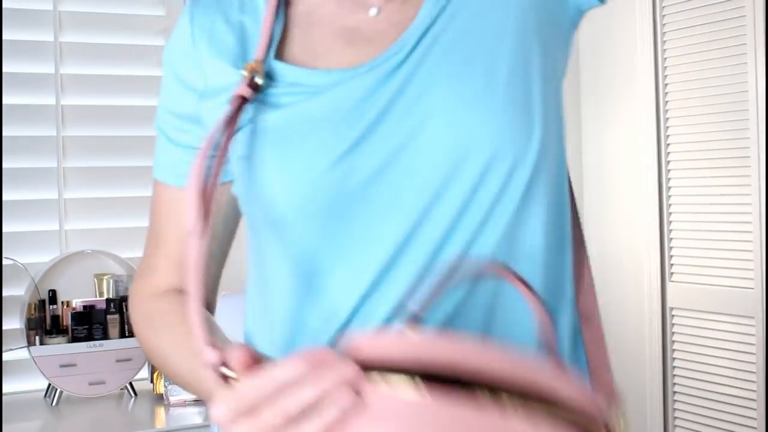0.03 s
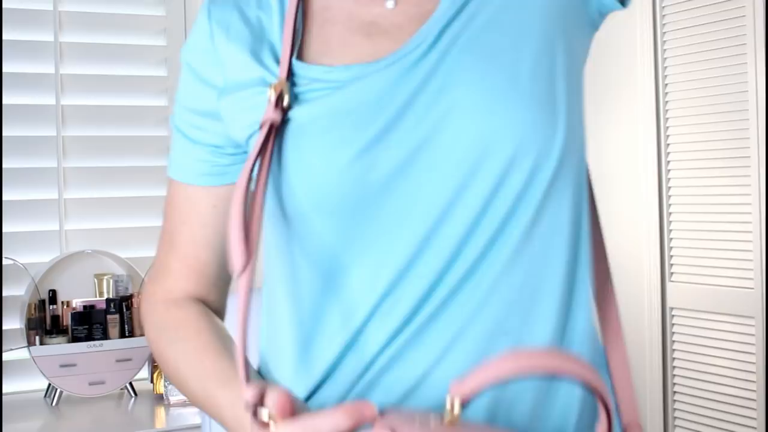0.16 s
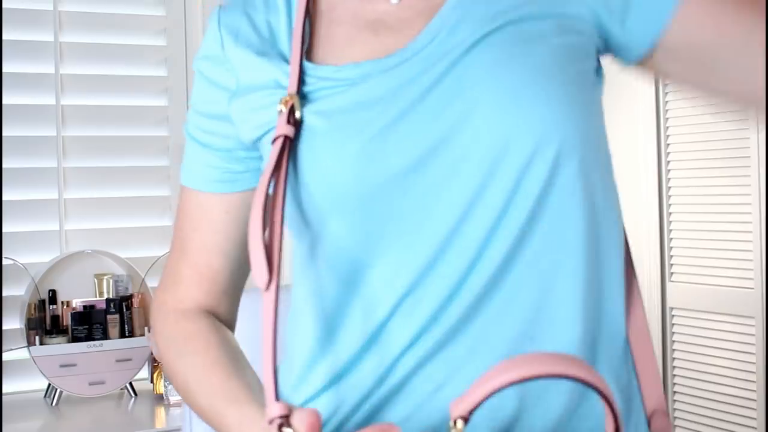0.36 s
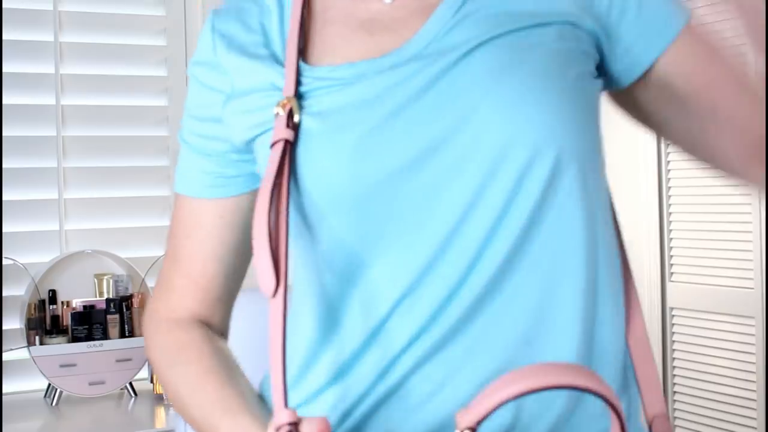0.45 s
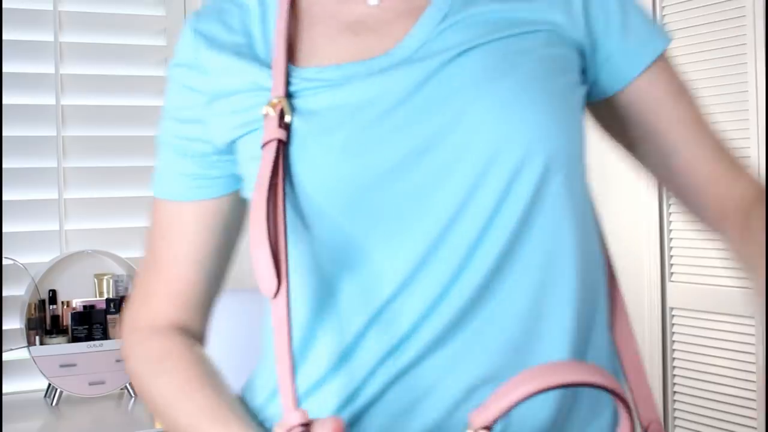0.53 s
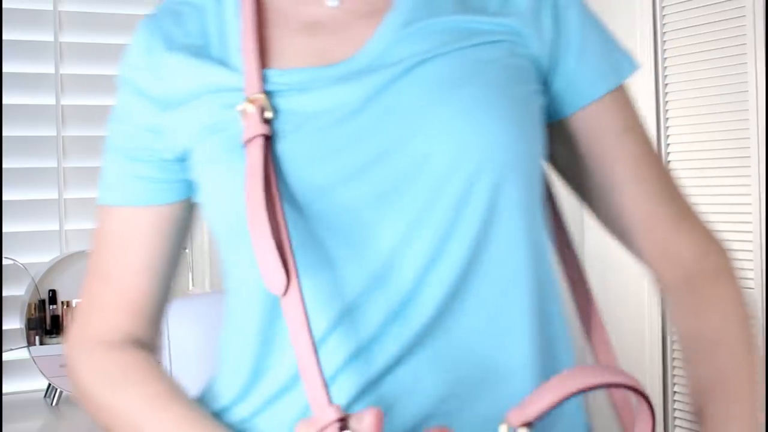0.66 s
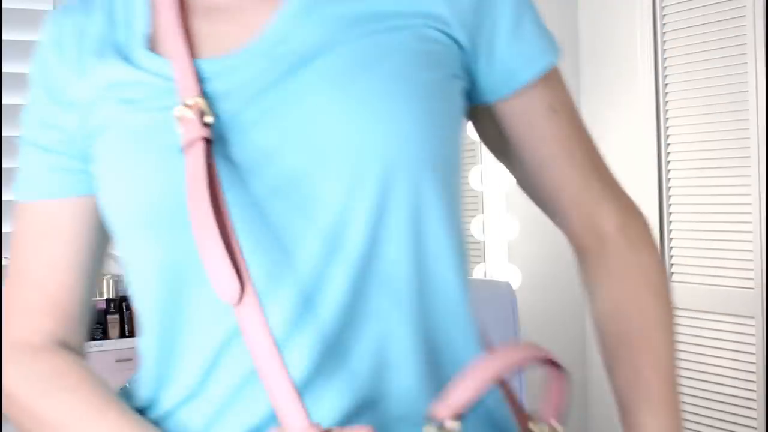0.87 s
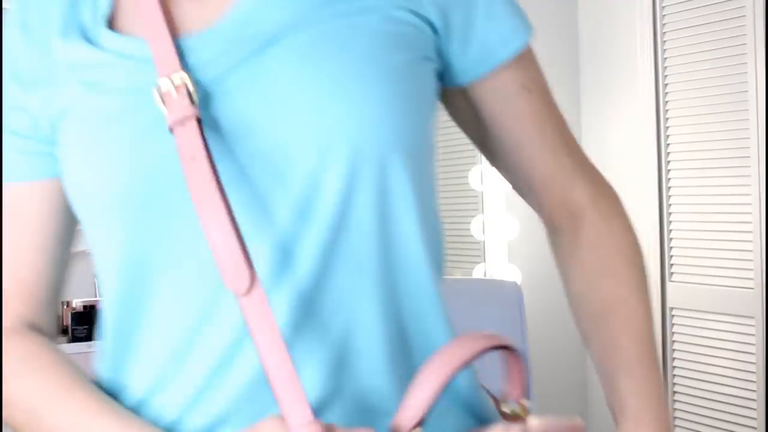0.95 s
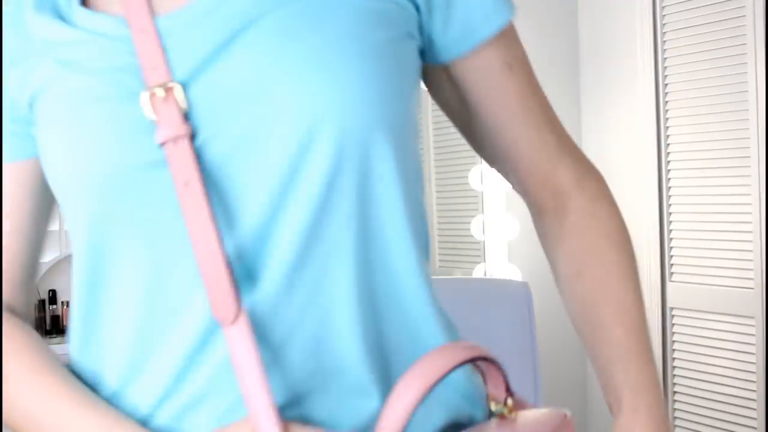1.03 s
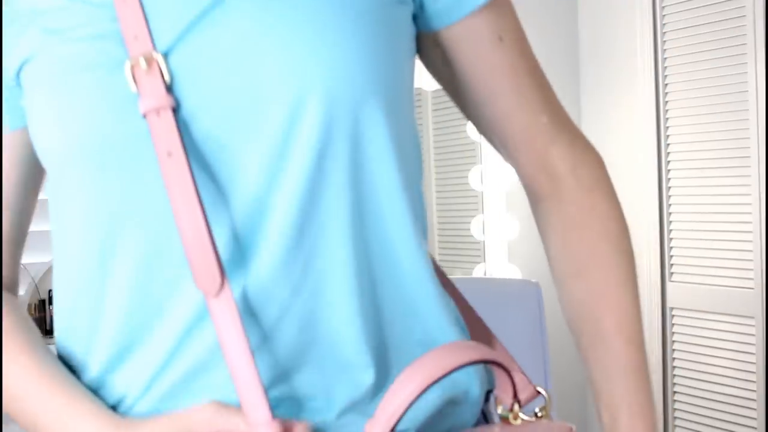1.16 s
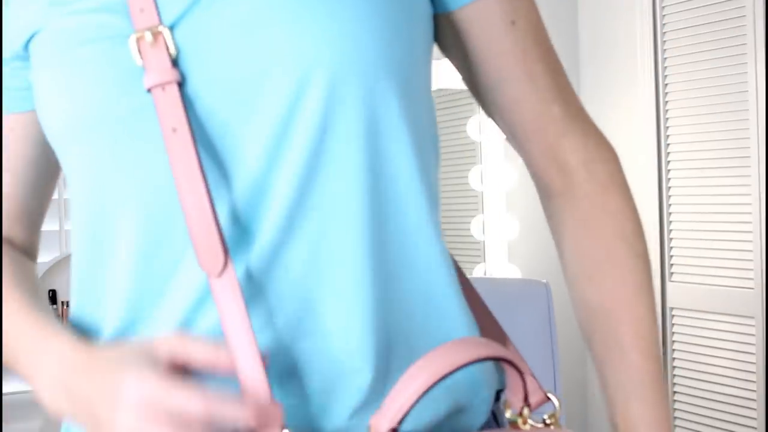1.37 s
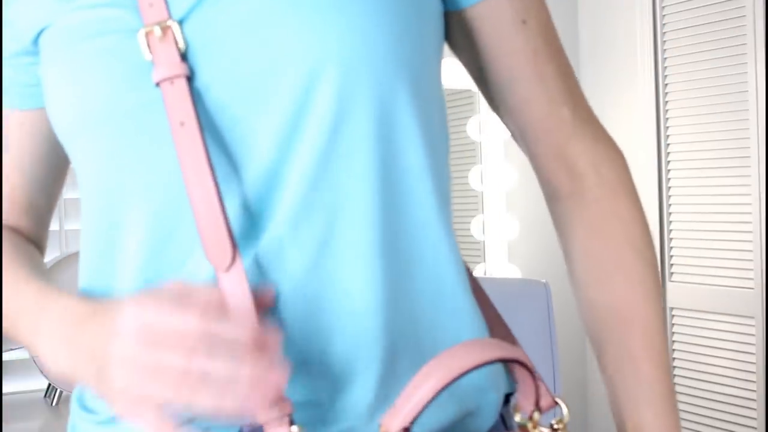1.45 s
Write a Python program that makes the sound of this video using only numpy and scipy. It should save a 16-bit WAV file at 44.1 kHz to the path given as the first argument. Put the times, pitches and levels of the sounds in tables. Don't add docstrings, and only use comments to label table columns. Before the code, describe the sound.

A stiff leather handbag is slung over a shoulder close to the microphone, thudding hollowly while buckles tick brightly, then the strap scrapes over a shirt and another sharp metal clink follows, in a quiet room.

```python
import sys
import numpy as np
from scipy import signal
from scipy.fft import rfft, irfft
from scipy.io import wavfile
from scipy.ndimage import uniform_filter1d

SR = 44100
rng = np.random.default_rng(int(sys.argv[2]) if len(sys.argv) > 2 else 0)


def file_out(sig):
    cols = np.atleast_2d(sig).T
    lim = np.clip(cols, -1, 1)
    pcm = np.round(lim * 32767).astype(np.int16)
    wavfile.write(sys.argv[1], SR, pcm)


def elevation(decibels):
    levels = np.asarray(decibels, float)
    return 10 ** (levels / 20)


N = 66150


def evened(x):
    return x / np.sqrt(np.mean(x ** 2) + 1e-20)


def add(mix, s, sound):
    part = mix[round(s * SR):][:len(sound)]
    part += sound[:len(part)]


def read(points, hz):
    f, value = np.transpose(points)
    return np.interp(np.log(hz + 1), np.log(f + 1), value, left=value[0], right=value[-1])


def colour(x, points):
    gain = elevation(read(points, np.fft.rfftfreq(len(x), 1 / SR)))
    return evened(irfft(rfft(x) * gain, len(x)))


def resonate(x, hz, width_hz):
    return signal.lfilter(*signal.iirpeak(min(hz, SR / 2.1), hz / width_hz, SR), x)


# f/Hz, level/dB per Hz
HISS = [(12, -50), (20, -16), (134, -2), (234, -1.5), (738, -26.5), (1260, -43), (1480, -17), (1860, -30.5),
        (16000, -42.5)]
# f/Hz, rms level/dB
HUM = [(59, -53), (120, -47.5)]


def air():
    hiss_db = -49
    t = np.arange(N) / SR
    waver = evened(uniform_filter1d(rng.standard_normal((len(HUM), N)), 1500, axis=1))
    hum = np.zeros(N)
    for (hz, db), w in zip(HUM, waver):
        phase = 2 * np.pi * (hz * t + rng.random())
        hum += elevation(db + 0.5) * (1 + 0.05 * w) * np.sin(phase)
    return elevation(hiss_db) * colour(rng.standard_normal(N), HISS) + hum


# f/Hz, t60/s
REVERBERATION = [(400, 0.21), (3000, 0.66), (8000, 0.2), (15000, 0.031)]


def room(x):
    taps = np.zeros(SR // 2)
    at = np.arange(60, len(taps) - 20, 20)
    taps[at + rng.integers(0, 20, len(at))] = rng.choice([-1., 1.], len(at))
    hz, t, z = signal.stft(taps, SR, nperseg=256)
    decay = elevation(-60 * t / read(REVERBERATION, hz)[:, None])
    tail = signal.istft(z * decay, SR, nperseg=256)[1]
    return signal.fftconvolve(x, tail / np.linalg.norm(tail))[:N]


GRAINS_PER_S = 1200


def grainy(per_s, spread_db, smooth):
    burst_decay_s = 0.0043
    size = elevation(spread_db * np.minimum(rng.exponential(1, N), 4))
    size = size * (rng.random(N) < per_s / SR)
    bursts = signal.lfilter([1], [1, -np.exp(-1 / (burst_decay_s * SR))], size)
    return rng.standard_normal(N) * (smooth + evened(bursts))


# t/s, shirt level/dB, strap level/dB, jostle level/dB, leather level/dB
HANDLING = [(0, -48.5, -59, -55, -41), (0.049, -46.5, -54.5, -42.5, -38), (.2, -45, -63, -52, -42.5),
            (.33, -49, -52, -51.5, -37), (0.451, -48.5, -60, -49.5, -57), (0.551, -50, -67, -41, -46),
            (.63, -54.5, -65, -43, -47.5), (.78, -49.5, -65, -38, -43.5), (.86, -51, -56.5, -38, -46.5),
            (1.05, -51, -62, -46, -50.5), (1.15, -48.5, -50, -45, -44), (1.27, -47.5, -66, -44.5, -68.5),
            (1.331, -54.5, -69, -45.5, -41.5), (1.5, -62, -72, -74, -57)]


def control(column):
    rows = np.array(HANDLING)
    return elevation(np.interp(np.arange(N) / SR, rows[:, 0], rows[:, column]))


def jostles():
    taps_per_s = 230
    taps = (rng.random(N) < taps_per_s / SR) * rng.standard_normal(N)
    ring = bag_ring(0.13, np.zeros(len(BAG_MODES)))
    return evened(signal.oaconvolve(taps, ring)[:N]) * control(column=3)


# f/Hz, level/dB per Hz
SHIRT = [(1200, 2.5), (2000, 1), (2700, -4), (3900, 2.5), (4800, -6), (6000, -10), (9000, -17.5),
         (16000, -26)]


def shirt_rustle():
    return colour(grainy(GRAINS_PER_S, 0.92, 0.65), [(300, -24.0)] + SHIRT) * control(column=1)


# f/Hz, level/dB per Hz
STRAP = [(3500, -63), (6500, -9), (8000, -7), (12000, -10.5), (16000, -13.5)]


def strap_fizz():
    return colour(grainy(GRAINS_PER_S / 2, 3.2, 0.64), [(1500, -54)] + STRAP) * control(column=2)


# f/Hz, level/dB per Hz
LEATHER = [(110, -36.5), (200, -0.5), (330, -12), (650, 1.9), (1000, -2.5), (1400, -4), (2200, -15),
           (5000, -51)]


def leather_crumple():
    return colour(grainy(GRAINS_PER_S / 3, 1.9, 0.21), LEATHER + [(16000, -70)]) * control(column=4)


# start t/s, level/dB, rise/s, t60/s
SLIDES = [
    (0.639, -44, 0.019, 0.26),
    (0.669, -33, 0.0097, 0.45),
    (1.034, -42, 0.0014, 0.012),
]
# f/Hz, level/dB per Hz
SLIDE = [(1200, -25), (2400, -1), (3300, -5.5), (4700, -9.5), (5800, -24), (8000, -35)]


def slides():
    t = np.arange(N) / SR
    shape = np.zeros(N)
    for s, db, rise, t60 in SLIDES:
        decay = elevation(db - 60 * np.maximum(t - s - rise, 0) / t60)
        shape += np.clip((t - s) / rise, 0, 1) * decay
    return colour(grainy(GRAINS_PER_S, 5.65, 0.55), [(400, -49)] + SLIDE + [(16000, -61)]) * shape


# t/s, f/Hz, level/dB, t60/s
RINGS = [(.068, 14950, -46, .18), (.137, 14020, -45, .22), (.137, 11550, -41, .035), (.18, 15250, -49, .12),
         (.18, 11450, -41, .035), (1.09, 14250, -35, .04), (1.09, 14880, -31, .045),
         (1.113, 11750, -32, .02), (1.116, 14100, -32, .012), (.354, 2750, -30, .025),
         (.155, 1400, -31, .04), (.21, 1400, -31, .04), (1.035, 3050, -35, .018), (1.125, 12300, -32, .015),
         (.25, 12100, -46, .08)]


def rings():
    out, t = np.zeros(N), np.arange(SR // 5) / SR
    sway = rng.standard_normal((len(RINGS), len(t)))
    sway = evened(uniform_filter1d(sway, size=180, axis=1))
    for (s, hz, db, t60), w in zip(RINGS, sway):
        add(out, s, elevation(db - 60 * t / t60) * np.sin(2 * np.pi * hz * t) * (.7 + .55 * w))
    return out


# t/s, level/dB, tint f/Hz, dull share level/dB, t60/s
CLINKS = [(0.0456, -36, 13740, -14, 0.0079), (.0625, -41, 14500, -20, 0.0087),
          (0.068, -20, 15200, -9, 0.0061), (0.0976, -31.5, 8000, -3, 0.013),
          (0.1369, -27, 13900, -13, 0.017), (.1405, -39, 8460, -4, 0.0044),
          (0.1793, -19.5, 9800, -7.5, 0.0059), (0.1813, -21, 14500, 1, 0.0068), (.209, -34, 9500, -1, .008),
          (.2382, -35, 11800, -37, .012), (0.2655, -33, 9170, -3, 0.014), (0.2755, -26, 7240, -14, 0.01),
          (0.2863, -8, 7600, -6.5, 0.0052), (.2885, -31.5, 4140, 0, 0.012),
          (0.3558, -29.5, 10300, -14, 0.013)]
# t/s, level/dB, tint f/Hz, dull share level/dB, t60/s
LATE_CLINKS = [(0.817, -35, 14800, -4, 0.0072), (0.8236, -33, 10480, -12, 0.0064),
               (0.8355, -30, 13200, -15.5, 0.0037), (0.847, -24, 8540, -1, 0.0076),
               (0.8519, -30.5, 6500, -2, 0.011), (0.8905, -36, 8466, 8, 0.0053),
               (.908, -38, 6250, -5, 0.0055), (0.9248, -29.5, 9080, -13, 0.0046),
               (0.9315, -34.5, 9100, 2, 0.005), (.995, -40, 6300, -11, .006),
               (1.0889, -7, 15200, -13, 0.0059), (1.0897, -13.5, 10040, -12, 0.0041),
               (1.0912, -25, 11900, -3, .01), (1.0935, -33, 11000, 2, 0.0072), (1.099, -27, 8000, -5, .01),
               (1.1126, -18, 11280, -27, 0.018), (1.1155, -29.5, 14000, 6.5, 0.014),
               (1.1206, -28.5, 7400, 5, 0.012), (1.1246, -24.5, 12100, -18, 0.011),
               (1.137, -35, 7900, 5, 0.012), (1.142, -36, 4020, -4, 0.01),
               (1.2893, -39.5, 11000, -1, 0.0099)]
# f/Hz, width f/Hz, level/dB
METAL = [(7530, 3800, -8.5), (10600, 420, -11.5), (11500, 590, -3.5), (14300, 730, -12), (15600, 810, -13)]


def clinks():
    rise_s, snap = .0006, 1.1
    tint_width_hz, tint_db, flat_db = 1300, 5, -8
    dull_hz, dull_width_hz, dull_grit = 3100, 4000, .18
    out, t = np.zeros(N), np.arange(SR // 5) / SR
    contact = np.arange(len(t)) == round(rise_s * SR)
    for s, db, hz, dull_db, t60 in list(CLINKS) + list(LATE_CLINKS):
        envelope = np.minimum(t / rise_s, 1) * elevation(-60 * t / max(t60, 0.004))
        burst = rng.standard_normal(len(t)) * envelope + snap * contact
        tick = elevation(flat_db) * np.diff(burst, prepend=0)
        for f, width, d in METAL:
            tick += elevation(d) * resonate(burst, f, width)
        tick += elevation(tint_db) * resonate(burst, hz, tint_width_hz)
        dull = resonate(dull_grit * burst + contact, dull_hz, dull_width_hz)
        dull = resonate(dull, dull_hz, dull_width_hz)
        add(out, s, elevation(db) * (tick / abs(tick).max() + elevation(dull_db) * dull / abs(dull).max()))
    return out


BAG_HZ = 400
# f/Hz, level/dB, t60/s, share from 0 (lower) to 1 (upper)
BAG_MODES = [(192, -27.5, 0.059, 0.7), (272, -12, 0.044, 0.492), (357.6, 5, 0.048, 0),
             (421, 0.5, 0.041, 0.12), (485.6, 0, 0.037, 0.97), (597.8, -10, 0.062, 0.95),
             (735.5, -6, 0.032, 0.496), (932, -14.5, 0.031, 1), (1106, -10.5, 0.016, 0.66)]


def bag_ring(upper_db, shift, pitch_hz=BAG_HZ):
    swell_cycles, detune, low_cut_hz = 0.82, 0.039, 180
    t = np.arange(SR // 4) / SR
    ring = np.zeros(len(t))
    for (hz, db, t60, upper), d in zip(BAG_MODES, shift):
        decay = elevation(db + (upper - .5) * upper_db - 60 * t / t60)
        swell = 1 - np.exp(-t * hz / swell_cycles)
        mode_hz = hz * pitch_hz / BAG_HZ * (1 + detune * d)
        ring += np.sign(upper - .5) * decay * swell * np.sin(2 * np.pi * mode_hz * t)
    ring = signal.sosfilt(signal.butter(2, low_cut_hz, "high", fs=SR, output="sos"), ring)
    return ring / abs(ring).max()


def slap(noise):
    hz, width_hz, t60, top_hz = 1600, 800, .016, 3700
    t = np.arange(len(noise)) / SR
    burst = noise * elevation(-60 * t / t60) + 7 * (t == 0)
    sound = resonate(burst, hz, width_hz) + 0.13 * resonate(burst, 2 * hz, width_hz)
    sound = signal.sosfilt(signal.butter(8, top_hz, fs=SR, output="sos"), sound)
    return sound / abs(sound).max()


# t/s, level/dB, upper against lower modes level/dB, slap level/dB, pitch f/Hz
KNOCKS = [(0.0, -26.5, 2, -39, 392.5), (0.026, -27.5, 0, 3.5, 382), (0.05, -27.5, -6, -11, 385),
          (0.0685, -25, 17, -1.5, 438), (.18, -30, 2, -18, 402), (0.202, -24, 3, -12, 403),
          (.21, -26.5, 14, 0.5, 405), (0.239, -2.5, 1, -7.5, 407.6), (0.274, -15, -2, -25, 394),
          (.283, -19.5, 1, -13, 402), (0.295, -22.5, 4, -19, 384), (0.325, -25.5, 6, -22, 406),
          (0.347, -26, 1, -24, 403), (0.38, -17.5, -12.5, -30, 397), (0.401, -31.5, 9, -30, 414),
          (0.494, -11, 5.5, -17, 398), (0.568, -22, -1, -18, 406), (0.6, -20, -1, -22, 407),
          (0.67, -13, 7, -15, 403), (0.679, -6, 32, -32, 414.4), (0.685, -16.5, 24, -32, 406),
          (.689, -18.5, 20, -34, 418.4), (.693, -12, 16, -16, 401.5), (0.704, -17, 1, -26, 408),
          (.717, -20.5, 5, -14, 418), (0.736, -20, 17, -25, 447), (.768, -29.5, 18, -20, 413),
          (0.85, -28.5, -20, 2.5, 402.7), (0.905, -29, -25, -24, 380), (0.952, -13, 1, -19.5, 400),
          (0.987, -18, -3.5, -21, 415), (0.996, -20, -4, -30, 410), (1.017, -26.5, 3, -24, 413),
          (1.091, -19, -14, -7.5, 405), (1.113, -23, -19, -7.5, 396), (1.227, -29, -12, -20, 406),
          (1.263, -33, -15, -9, 380), (1.281, -27, 6, -10, 397), (1.34, -17, -1, -12.5, 403.6)]


def knocks():
    out = np.zeros(N)
    for s, db, upper_db, slap_db, pitch_hz in KNOCKS:
        noise = rng.standard_normal(2000)
        shift = np.clip(noise[-len(BAG_MODES):], -1, 1)
        add(out, s, elevation(db) * bag_ring(upper_db, shift, pitch_hz))
        add(out, s, elevation(db + slap_db) * slap(noise))
    return out


def scene():
    knock_room_db, metal_room_db = -11, -10
    dull = knocks()
    bright = clinks() + rings()
    tail = room(elevation(knock_room_db) * dull + elevation(metal_room_db) * bright)
    rustle = shirt_rustle() + strap_fizz() + leather_crumple() + jostles()
    return (dull + bright + tail + rustle + slides() + air())[None]


def roll_off(x):
    return signal.sosfilt(signal.butter(12, 17120, fs=SR, output="sos"), x)


def record(dry):
    edge_hz, edge_db = 15900, -34
    corners_hz = [0, edge_hz - 150, edge_hz + 150, SR / 2]
    shelf = signal.firwin2(401, corners_hz, [1, 1, elevation(edge_db), elevation(edge_db)], fs=SR)
    x = signal.sosfilt(signal.butter(2, 24, "high", fs=SR, output="sos"), dry)
    finished = signal.oaconvolve(x, shelf[None], "same")
    return roll_off(finished)


dry = scene()
out = record(dry)
file_out(out)
```